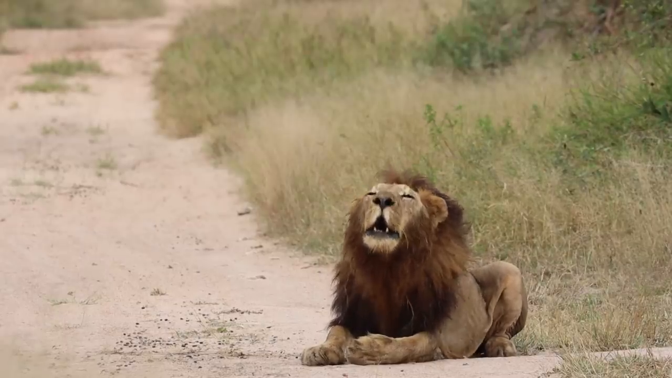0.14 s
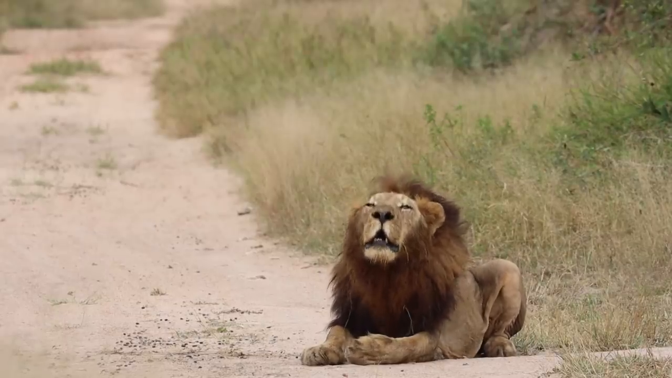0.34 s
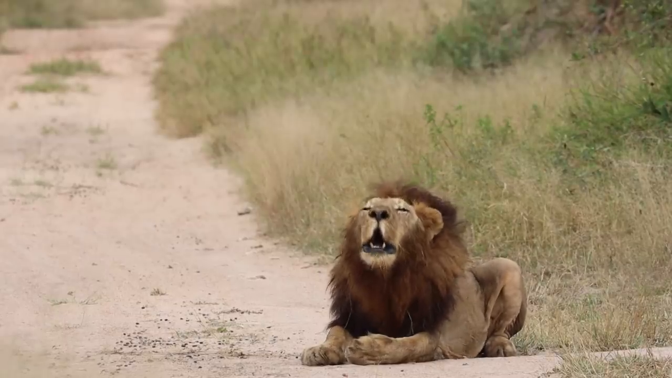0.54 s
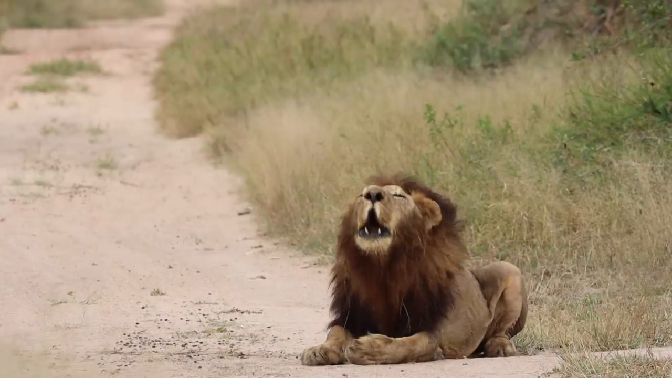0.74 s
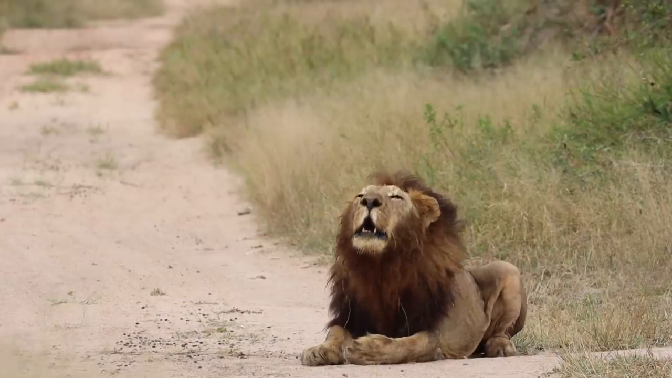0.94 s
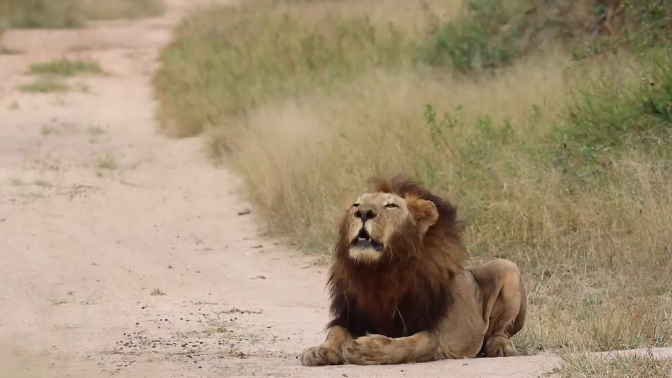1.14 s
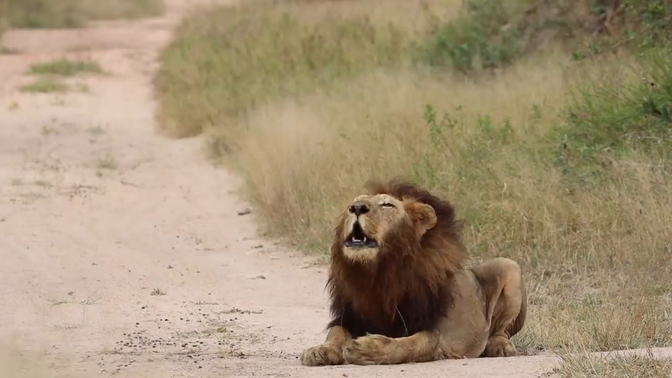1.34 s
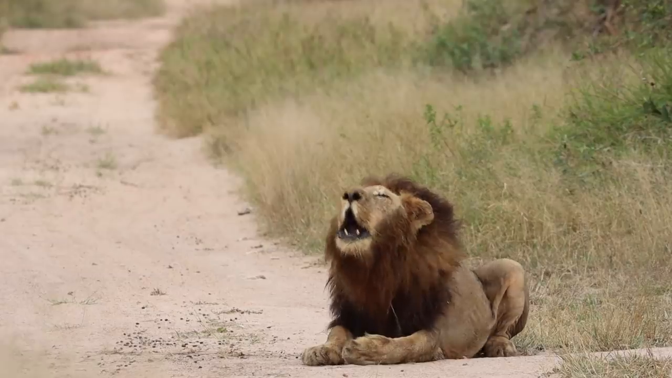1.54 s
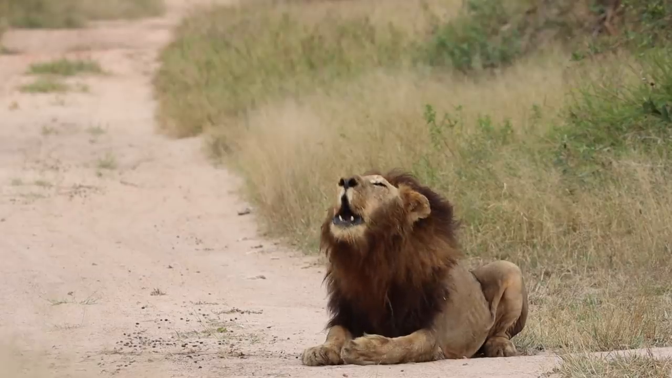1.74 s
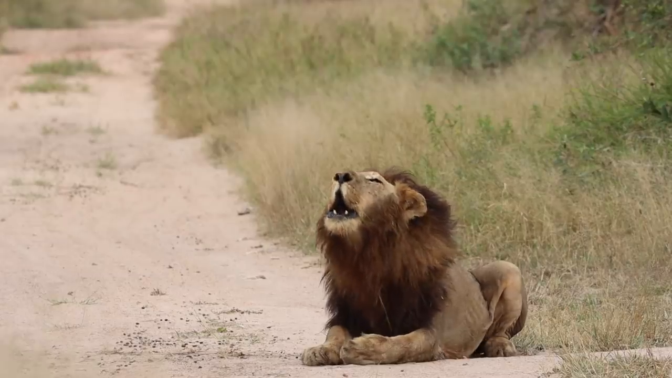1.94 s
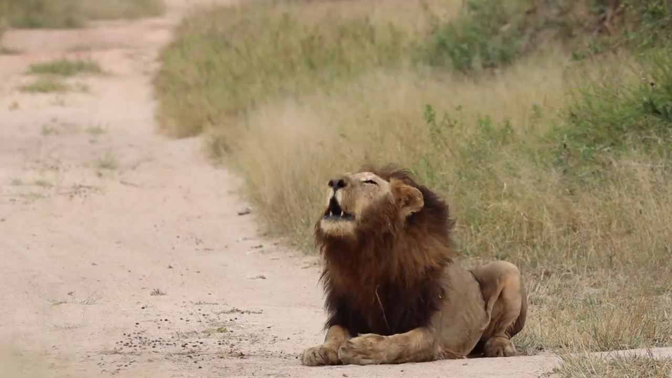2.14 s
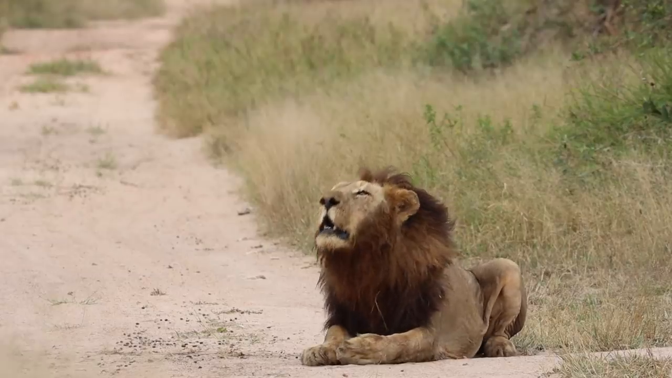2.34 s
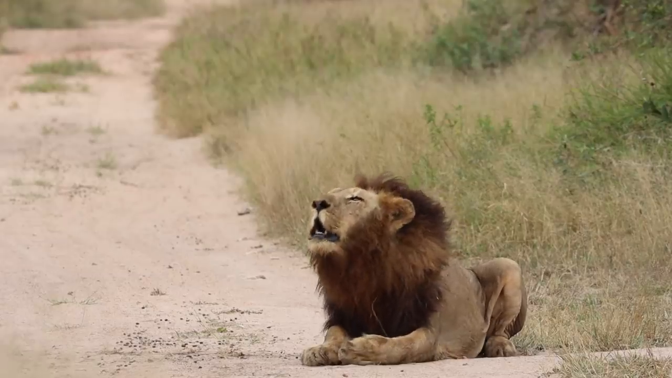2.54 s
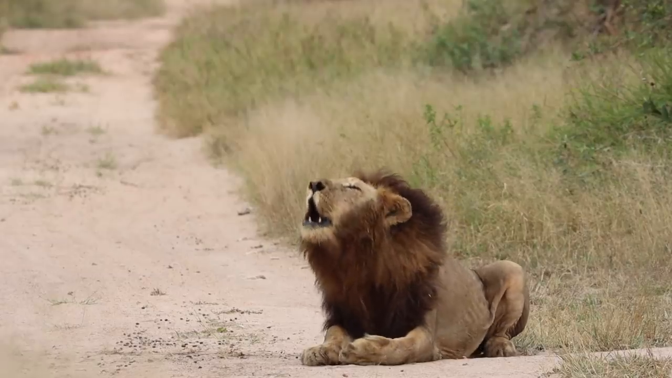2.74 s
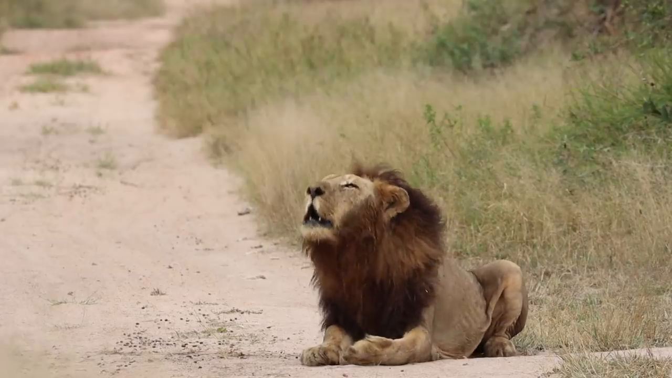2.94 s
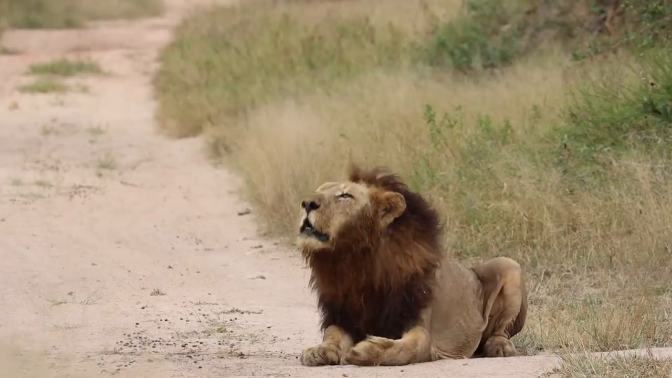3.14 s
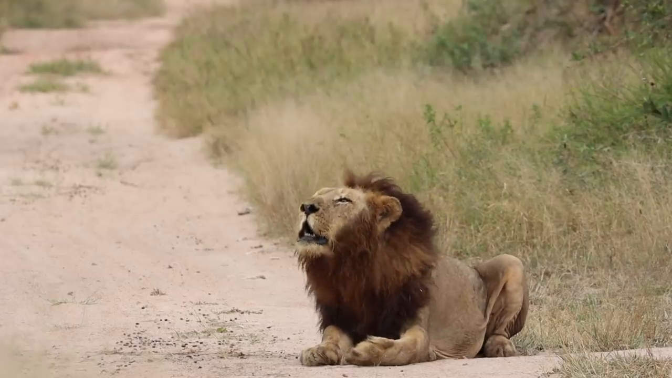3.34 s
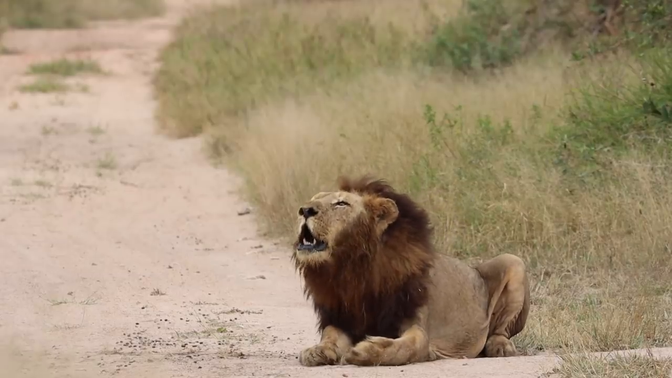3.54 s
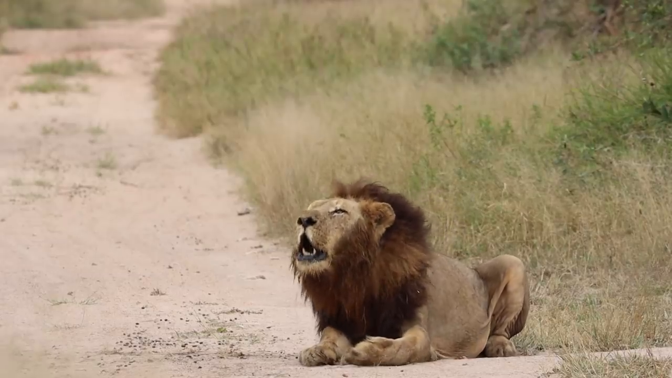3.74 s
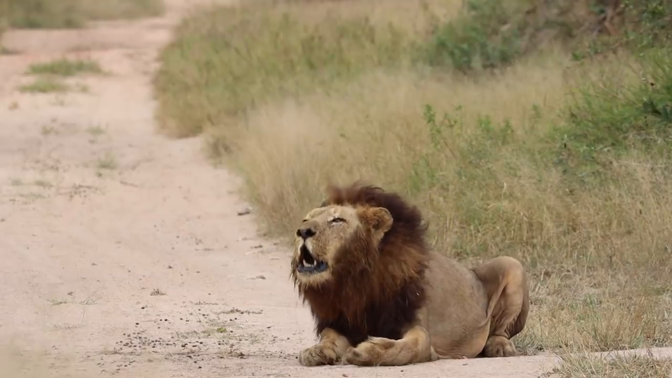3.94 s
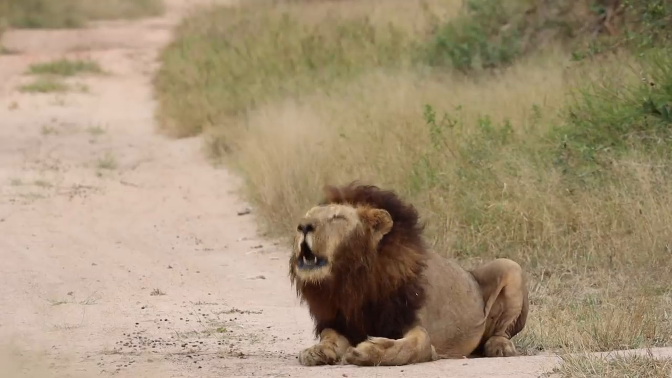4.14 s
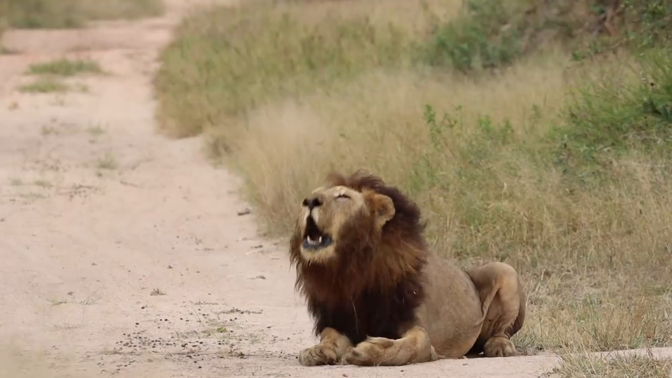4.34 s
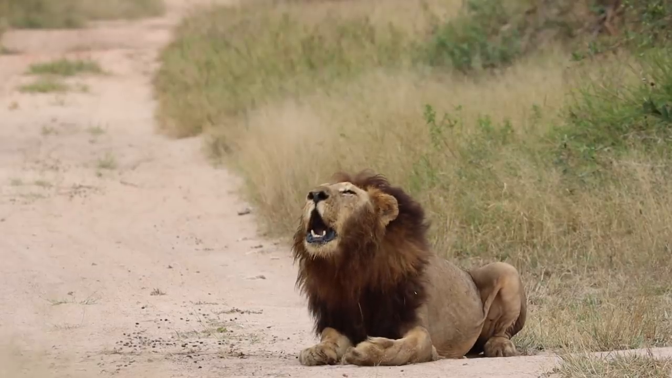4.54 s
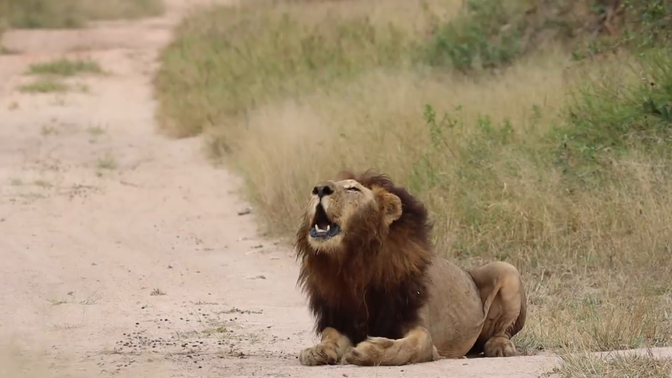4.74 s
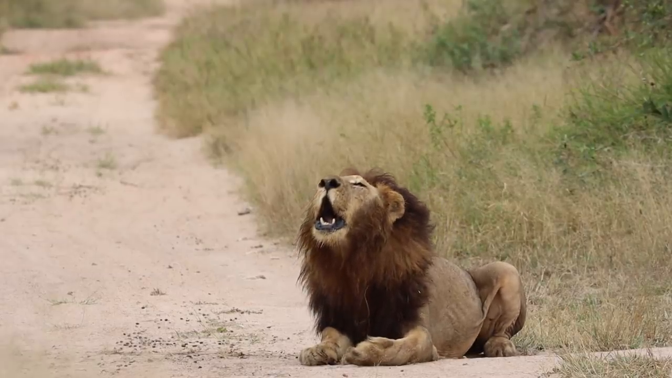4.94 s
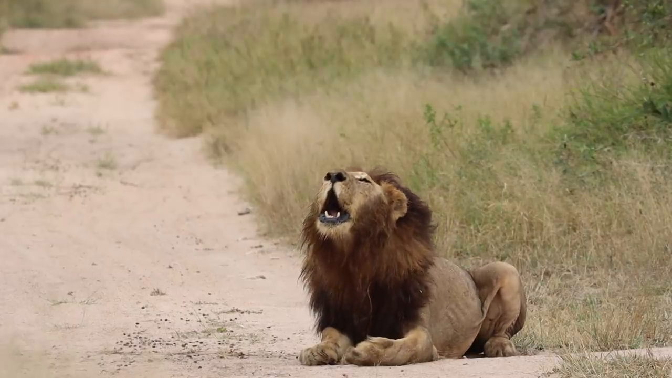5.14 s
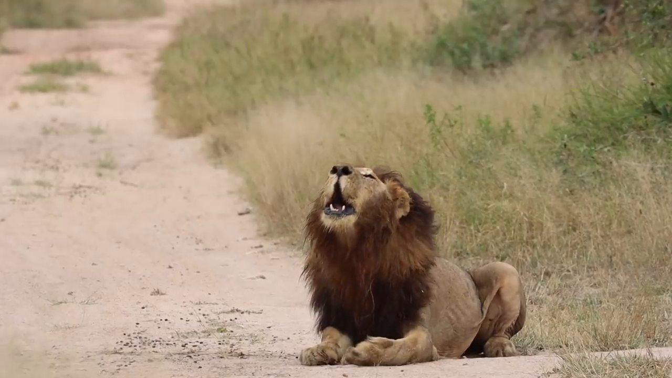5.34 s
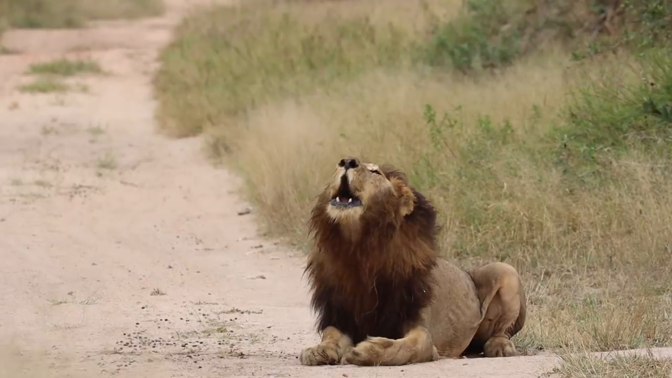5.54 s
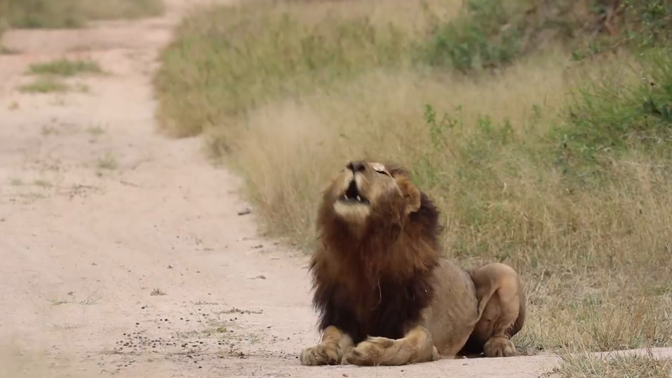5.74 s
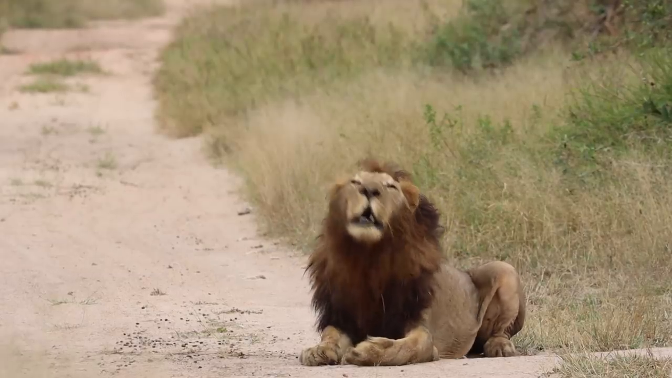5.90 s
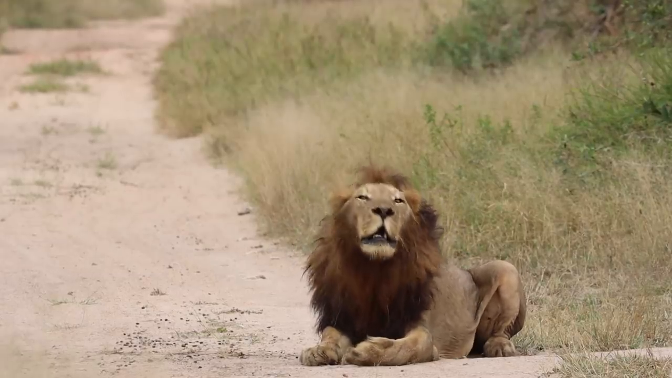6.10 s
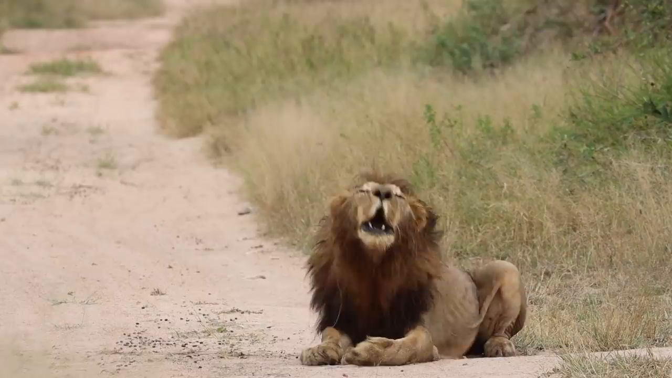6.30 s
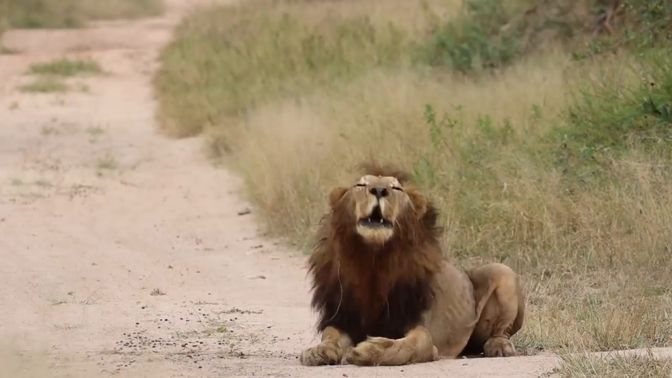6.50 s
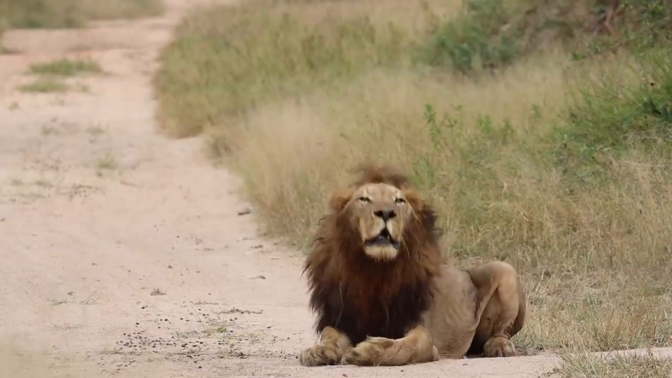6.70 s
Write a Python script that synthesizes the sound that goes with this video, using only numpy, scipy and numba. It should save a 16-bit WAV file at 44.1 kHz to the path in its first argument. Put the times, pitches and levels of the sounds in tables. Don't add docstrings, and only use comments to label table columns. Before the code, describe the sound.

Deep, hoarse lion grunts, wet and rasping, each lasting a fraction of a second; the third is longer and doubled. The animal sucks in air with a low growl between calls. After a quiet pause comes one powerful roar, open and nearly tonal, then harsh, breaking and dropping. A final short grunt follows. Natural outdoor pickup, mostly dry, with soft wind, insects, sparse high chirps and little plastic clicks.

```python
import sys
import numpy as np
from scipy import signal
from scipy.fft import rfft, irfft, next_fast_len
from scipy.io import wavfile
from scipy.ndimage import uniform_filter1d, map_coordinates
from numba import njit

SR = 44100
rng = np.random.default_rng(int(sys.argv[2]) if len(sys.argv) > 2 else 0)


def unload_wav(signal):
    wavfile.write(
        sys.argv[1],
        SR,
        np.round(np.clip(np.atleast_2d(signal).T, -1, 1) * 32767).astype(np.int16),
    )


def invert_db(level):
    return 10 ** (np.asarray(level, dtype=float) / 20)


N = 298116
TIME = np.arange(N) / SR
ONSET_S, SILENT_DB = .035, -74.5

# frequency in Hz, level in dB per Hz.
BREATH_WIDE = [(1000, -43), (1700, -13.5), (2910, -3.5), (3800, -9.5), (5200, -8.5), (6090, -17.5),
               (7600, -18.5), (10400, -25.5), (12400, -21.5), (15500, -40)]
# frequency in Hz, gain in dB.
NOSE_VALLEY = [(1500, 0), (1620, -7), (1720, -17), (1830, -3), (2000, 0)]


def unit(x):
    return x / np.sqrt(np.mean(x ** 2) + 1e-20)


def steady(x, span_s):
    span = int(span_s * SR)
    power = uniform_filter1d(uniform_filter1d(x ** 2, span), span)
    return x / np.sqrt(np.abs(power) + 1e-20)


def along(points, hz):
    f, v = np.transpose(points)
    return np.interp(np.log(hz + 1), np.log(f + 1), v)


def curves(rows):
    s, *cols = np.transpose(rows)
    return [np.interp(TIME, s, c) for c in cols]


def wobble(rate_hz):
    return map_coordinates(rng.standard_normal(int(N * rate_hz / SR) + 4), [TIME * rate_hz])


def filtered(x, response):
    m = next_fast_len(N + SR // 2)
    return irfft(rfft(x, m) * response(np.fft.rfftfreq(m, 1 / SR)), m)[..., :N]


def shaped(x, points):
    return filtered(x, lambda f: invert_db(along(points, f)))


def resonant_noise(hz, width_hz):
    response = lambda f: 1j * f * width_hz / (hz * hz - f * f + 1j * f * width_hz)
    return unit(filtered(rng.standard_normal(N), lambda f: response(f) ** 2))


def patchy(x, bins, frames, depth_db):
    z = signal.stft(x, nperseg=512)[2]
    field = uniform_filter1d(rng.standard_normal(z.shape[-2:]), bins, 0)
    field = uniform_filter1d(field, frames, 1)
    return signal.istft(z * invert_db(depth_db * unit(field)), nperseg=512)[1][..., :N]


def glides(rows):
    out = np.zeros(N + SR)
    for s, length_s, from_hz, to_hz, db in rows:
        u = np.linspace(0, 1, int(length_s * SR))
        hz = from_hz + (to_hz - from_hz) * u ** 1.3
        sweep = np.sin(2 * np.pi * np.cumsum(hz) / SR)
        out[int(s * SR):][:len(u)] += invert_db(db) * np.sin(np.pi * u) * sweep
    return out[:N]


@njit
def two_pole(x, turn, keep):
    y = np.zeros(len(x))
    for i in range(2, len(x)):
        y[i] = (1 - keep) * (x[i] - x[i - 2]) + 2 * keep * np.cos(turn[i]) * y[i - 1] - keep * keep * y[i - 2]
    return y


def wandering(x, modes, reach, lift):
    out = np.zeros(N)
    for k, (hz, width_hz, db) in enumerate(modes):
        turn = 2 * np.pi * hz / SR * lift * (1 + reach * wobble(12))
        keep = np.exp(-np.pi * width_hz / SR)
        out += (-1) ** k * invert_db(db) * two_pole(two_pole(x, turn, keep), turn, keep)
    return out


def bush():
    # frequency in Hz, level in dB per Hz.
    spectrum = [(18, -81.5), (30, -42.5), (140, -2.5), (307, -21.5), (341, -5.5), (532, -6.5), (709, -13.5),
                (852, -8.5), (970, -19.5), (1170, -13), (1820, -23), (2360, -22.5), (3320, -25.5),
                (6720, -30), (15500, -36.5)]
    # frequency in Hz, left-right likeness from -1 to 1.
    likeness = [(60, 0.49), (240, 0.89), (950, 0.13), (3770, -0.24), (15000, -0.019)]
    pair = patchy(rng.standard_normal((2, N)), 6, 10, 1.6)

    def mid_side(hz):
        angle = np.arccos(np.clip(along(likeness, hz), -1, 1)) / 2
        return invert_db(along(spectrum, hz)) * [np.cos(angle), np.sin(angle)]
    mid, side = filtered(pair, mid_side)
    return invert_db(-52 + wobble(3)) * unit(np.array([mid + side, mid - side]))


def insects():
    # centre in Hz, width in Hz, level in dB.
    drones = [(2350, 170, -69), (6520, 50, -83)]
    total = sum(invert_db(db + 1.5 * wobble(48)) * resonant_noise(hz, width_hz) for hz, width_hz, db in drones)
    return total * invert_db([[-1], [1]])


def bird():
    # start in seconds, length in seconds, from Hz, to Hz, level in dB.
    chirps = [
        (.3, 0.076, 7600, 8000, -81),
        (.49, 0.041, 7950, 8820, -67),
        (2.4, 0.049, 9680, 8710, -71),
        (3.49, 0.061, 7880, 8340, -67),
        (3.54, 0.014, 8170, 9200, -72),
    ]
    return glides(chirps)


def camera():
    # time in seconds, peak in dB.
    ticks = [
        (1.188, -53.5),
        (3.391, -52),
        (3.597, -52.5),
        (3.887, -74),
        (4.1, -51.5),
        (5.947, -54.5),
    ]
    # frequency in Hz, level in dB, t60 in seconds.
    shell = [(1144, 12.5, .018), (2354, 11, .022), (4500, 3, .01)]
    out, t = np.zeros(N + SR), np.arange(SR // 10) / SR
    for s, db in ticks:
        knock = 0.43 * invert_db(-60 * t / .01) * rng.standard_normal(len(t))
        for hz, level_db, t60_s in shell:
            knock += invert_db(level_db + rng.normal(0, 3.2) - 60 * t / t60_s) * np.sin(2 * np.pi * hz * t)
        out[round(s * SR):][:len(t)] += invert_db(db - 3.5) * knock
    return out[:N] * invert_db([[-2], [2]])


def scatter(x):
    # frequency in Hz, gain in dB.
    gain = [(60, -30), (500, -24), (900, -22), (1300, -13), (1680, -7), (2100, -15), (3400, -26),
            (6900, -12), (10000, -13), (11500, -11), (15000, -17)]
    t = np.arange(SR // 40) / SR
    tail = rng.standard_normal(len(t)) * invert_db(-60 * t / .02)
    spread = signal.fftconvolve(x, tail / np.linalg.norm(tail))[:N]
    return shaped(spread, gain) * [[1], [-1]]


def echoes(x):
    # frequency in Hz, t60 in seconds.
    decay = [(140, 0.99), (400, 0.27), (1500, 0.38), (3000, 0.19), (8000, 0.39)]
    hz, t, z = signal.stft(rng.standard_normal((2, SR)), SR, nperseg=256)
    tail = signal.istft(z * invert_db(-60 * t / along(decay, hz)[:, None]), SR, nperseg=256)[1]
    tail = 3.2 * tail[0] + 0.1 * tail
    delayed = np.pad(x, (1500, 0))[None]
    return signal.fftconvolve(delayed, tail / np.linalg.norm(tail[0]), axes=1)[:, :N]


def slaps():
    # time in seconds, peak in dB, centre in Hz.
    tissue = [(0.0179, -21, 2860), (0.1206, -23.5, 3100), (0.7457, -29, 2914), (0.855, -13.5, 3160),
              (0.9277, -21, 3020), (0.9452, -22.5, 2590), (1.6185, -31, 5211), (1.6644, -38, 1802),
              (1.8038, -31, 3987), (1.953, -35, 3020), (2.023, -33, 1813), (2.0384, -31, 3050),
              (2.0683, -22, 3640), (2.0913, -35, 3080), (2.1327, -25, 2880), (2.1518, -21.5, 2750),
              (2.2039, -31.5, 2943), (2.7652, -28, 3193), (2.8143, -17, 2895), (2.8882, -19, 2740),
              (2.9181, -21.5, 3447), (4.2298, -34.5, 2309), (4.2805, -22, 2950), (4.3642, -35, 2812),
              (4.9929, -23, 3376), (5.0604, -22, 3082), (5.4237, -27, 2083), (5.6051, -30, 3048),
              (5.7154, -18, 2951), (5.7362, -21, 2600), (5.7823, -18.5, 3036), (5.8638, -38, 2633),
              (6.4059, -44, 3128), (6.4536, -18.5, 2819), (6.545, -34.5, 5050), (6.561, -20, 3297)]
    # time in seconds, peak in dB, centre in Hz.
    smacks = [(0.017, -12, 816), (0.12, -8, 810), (0.73, -15.5, 739.6), (0.838, -24, 1130),
              (0.904, -14, 732), (0.945, -20.5, 732), (1.465, -27, 1150), (1.527, -31, 900),
              (1.548, -34, 800), (1.626, -19.5, 775), (2.793, -17, 805), (2.916, -27, 866),
              (4.194, -32.5, 733.5), (5.605, -17, 706), (6.405, -20, 749.4)]
    out, t = np.zeros(N + SR), np.arange(SR // 20) / SR
    f = np.fft.rfftfreq(len(t), 1 / SR) + 1
    for rows, octaves, t60_s, over_db in ((tissue, .6, .04, -9), (smacks, .3, .045, -8)):
        for s, db, hz in rows:
            colour = np.exp(-.5 * (np.log2(f / hz) / octaves) ** 2) + invert_db(-20 + along(BREATH_WIDE, f))
            puff = unit(irfft(rfft(rng.standard_normal(len(t))) * colour, len(t)))
            decay = invert_db(db + over_db - 60 * t / t60_s)
            out[round(s * SR):][:len(t)] += decay * puff * np.minimum(t / 0.0027, 1)
    return out[:N]


def gurgles():
    # start in seconds, length in seconds, from Hz, to Hz, level in dB.
    throat_sweeps = [(.08, 0.057, 233, 407, -19.5), (.69, 0.16, 191.3, 169, -17), (.765, 0.056, 648, 733, -24),
                     (.85, 0.047, 493, 428, -22), (.915, 0.079, 327.9, 447, -24),
                     (1.59, 0.1, 108.6, 96.27, -26.5), (1.945, 0.083, 462, 384.5, -25),
                     (2.03, 0.058, 256.3, 346.4, -19.5), (2.095, 0.096, 269, 397.6, -23.5),
                     (2.735, 0.06, 217.8, 180.7, -25.5), (2.905, 0.078, 321.4, 462.5, -26.5),
                     (4.18, 0.097, 111.5, 89.7, -31.5), (5.05, 0.051, 54.6, 45.1, -44),
                     (5.625, .05, 782, 685.2, -24.5), (5.645, 0.049, 241.2, 339, -19),
                     (5.695, .05, 1132, 946.2, -35.5), (5.722, 0.047, 582.5, 901, -19.5),
                     (5.78, 0.033, 393, 503.8, -21), (5.805, 0.037, 526.3, 922.4, -35.5),
                     (6.395, 0.015, 131, 161.2, -27), (6.515, .1, 260.7, 484.6, -18)]
    return glides(throat_sweeps)


def fold_state():
    # start in seconds, glide in seconds, clear share, regular flutter share, mouth closing (all 0-1).
    changes = [(0, 0, .2, .45, 0), (1.64, .05, .05, .8, 0), (1.86, .04, .23, .43, 0),
               (4.24, .07, .55, .3, .6), (4.3, .09, .93, .2, .6), (4.41, .06, 1, .2, 0),
               (4.7, .04, 1, .15, 1), (4.975, .02, .45, .3, 1), (5.13, .04, .72, .2, 1),
               (5.27, .03, .1, .8, .4), (5.55, .04, .25, .4, 0)]
    rows = []
    for (s, glide_s, *new), old in zip(changes, changes[:1] + changes[:-1]):
        rows += [(s, *old[2:]), (s + glide_s, *new)]
    return curves(rows)


def drawn_air():
    # start in seconds, peak in seconds, end in seconds, peak in dB.
    draws = [
        (0.483, 0.628, 0.74, -40),
        (1.294, 1.515, 1.58, -33),
        (2.482, 2.662, 2.72, -45),
        (6.103, 6.318, 6.56, -44),
    ]
    swell_db = 18
    rows = []
    for start, peak, end, db in draws:
        rows += [(start - ONSET_S, SILENT_DB), (start, db - swell_db), (peak, db),
                 (end, db - swell_db), (end + ONSET_S, SILENT_DB)]
    return curves(rows)[0] + 3 * wobble(18)


def voice_curves(clear, closing):
    # time in seconds, pitch in Hz, effort in dB, rasp in dB over the effort.
    grunt_1 = [(0.0, 159, -10, -23), (0.028, 150.7, -5.5, -13), (0.064, 144.4, -13, -10),
               (0.086, 136.9, -10.5, -22), (0.098, 124.2, -15, -17), (0.12, 119.5, -10, -21),
               (0.162, 111.2, -19.5, -11.5), (0.2, 112.4, -30.5, -20)]
    grunt_2 = [(0.706, 156.9, -23.5, -39), (0.747, 141.1, -14.5, -2.5), (0.77, 146.7, -7, -21.5),
               (0.793, 134.8, -18, -10.5), (0.817, 135, -16, -18), (0.841, 137.5, -8.5, -10),
               (0.879, 140.4, -18.5, -11), (0.916, 120.2, -17.5, -26.5), (0.987, 121.1, -26, -22)]
    grunt_3 = [(1.602, 158.5, -30.5, -19), (1.626, 152.6, -22, -1.5), (1.663, 151.8, -6, -12),
               (1.703, 153.8, -7.5, -22), (1.795, 152.4, -10, -18), (1.85, 153, -11.5, -15.5),
               (1.902, 140, -23.5, -12),
               (1.925, 135.1, -17, -23.5), (1.956, 138.4, -16.5, -9.5), (1.985, 140.2, -13.5, -18),
                   (2.02, 129.6, -19, -25), (2.077, 129.7, -13, -17), (2.116, 122.3, -15, -14.5),
                   (2.13, 124.6, -12, -18), (2.182, 115.6, -15, -27.5), (2.22, 111.1, -39.5, -14.5)]
    grunt_4 = [(2.75, 136.9, -26.5, -24), (2.796, 140.2, -12, -15), (2.836, 140.8, -4.5, -23),
               (2.86, 139.8, -12.5, -8.5), (2.89, 123.6, -12, -21), (2.925, 124.1, -12.5, -15),
               (2.965, 119.1, -24.5, -18), (2.991, 119, -29.5, -28)]
    grunt_5 = [(6.4, 125.5, -36.5, -8), (6.44, 139.8, -7, -18.5), (6.482, 140, -7.5, -16.5),
               (6.518, 121.1, -12, -23.5), (6.564, 115.1, -12.5, -21), (6.582, 114, -18.5, -16),
               (6.608, 110, -30, -17.5), (6.64, 112.6, -36.5, -22)]
    # as for the grunts, then throat share in dB.
    rising = [(4.19, 143.2, -40.5, -16, -6.5), (4.232, 147.2, -18.5, -16, -6.5),
              (4.258, 156.1, -20.5, -13.5, -2.5), (4.294, 156.1, -7, -15.5, -17),
              (4.33, 157.8, -5.5, -24, -20), (4.394, 204, -10.5, -19.5, -12.5),
              (4.442, 216.8, -10.5, -22.5, -8), (4.53, 221, -9.5, -27.5, -3)]
    steady_clear = [(4.55, 214, -11.5, -16, -1), (4.585, 210, -12.5, -14.5, -.2),
                    (4.69, 214.5, -11, -16, -2), (4.74, 200, -10.5, -25, -12),
                    (4.87, 194, -8.5, -21.5, -18), (4.97, 193.5, -11.5, -22, -10)]
    harsh = [(4.99, 197, -12, -16, -7.5), (5.098, 192.6, -12.5, -17.5, -3), (5.147, 205.4, -13, -12, -2.5),
             (5.254, 200, -9.5, -18, -1.5), (5.291, 171.9, -11, -13, -10.5), (5.319, 168.2, -7, -21, -14),
             (5.39, 164.2, -8.5, -21, -12), (5.559, 163.6, -8, -21.5, -14)]
    sinking_growl = [(5.578, 137.7, -24, -15, -1.5), (5.617, 142.6, -13.5, -14, -9.5),
                     (5.65, 139.5, -11, -20, -14.5), (5.678, 141.2, -21, -23.5, 0),
                     (5.699, 143.2, -15, -14, -13),
                     (5.729, 141, -12.5, -19, -3.5), (5.746, 138.6, -22.5, -16.5, -2),
               (5.763, 127.3, -18.5, -16, -14), (5.795, 119.2, -20, -16.5, -0.5),
               (5.831, 120.5, -18, -23, -27), (5.843, 126.6, -30.5, -14, -26.5),
               (5.88, 141, -34, -31, -4.5)]
    draw_over_db = [-1, -4, -11.5, -17.5, -9]

    def shared(grunt):
        return [(s, hz, db, rasp, -8 + .39 * (rasp + 15) - .16 * (hz - 135)) for s, hz, db, rasp in grunt]
    calls = [shared(g) for g in (grunt_1, grunt_2, grunt_3, grunt_4)]
    calls += [rising + steady_clear + harsh + sinking_growl, shared(grunt_5)]
    onset_hz, release_s = 200, .09
    rows = []
    for call in calls:
        first, _, _, *start = call[0]
        last, end_hz, _, *end = call[-1]
        rows += [(first - ONSET_S, onset_hz, SILENT_DB, *start), *call,
                 (last + release_s, end_hz, SILENT_DB, *end)]
    pitch_hz, effort, rasp, share = curves(rows)
    chest = effort - 13 * invert_db(4 * share)
    hiss = effort - 29 + .65 * (rasp + 15) + 2 * closing - 5.5 * clear
    rumble = -39.5 + .42 * effort - .32 * (pitch_hz - 120) + np.minimum(effort + 40, 0)
    levels = [chest, effort + share, effort + rasp, hiss, rumble]
    draw = drawn_air()
    levels = [20 * np.log10(invert_db(db) + invert_db(draw + over_db)) for db, over_db in zip(levels, draw_over_db)]
    return np.where(draw > effort, 161.3, pitch_hz), *levels


def vocal_tract():
    # time in seconds, throat in Hz, back of mouth in Hz, brightness in dB.
    larynx = [
        [(0.0, 377, 670, 4), (0.048, 407, 710, 2), (0.088, 327, 676, -2), (0.168, 380, 702, 4.5),
         (0.2, 343, 690, -12)],
        [(0.72, 372, 657, 3), (0.756, 420, 680, 10), (0.814, 383.3, 669.3, 1.5), (0.87, 422, 682.3, 6),
         (0.924, 360, 670, 10), (0.99, 391, 716, 2)],
        [(1.62, 368, 686, 2), (1.804, 390, 761, -2.5), (1.918, 336.1, 656, 5), (1.942, 383, 706.7, 1.5),
         (2.124, 327.3, 720, 2.5), (2.2, 337, 720, 3)],
        [(2.77, 342.1, 708.6, -2), (2.82, 371, 714, 1), (2.934, 349, 732.2, 2), (2.98, 384, 696, 4)],
        [(4.22, 348.5, 719, 8.5), (4.264, 363, 705.5, 2.5), (4.32, 411.6, 752, 1), (4.4, 350.6, 700, -3)],
        [(4.98, 389.7, 687, -4), (5.124, 407.5, 691.8, 2), (5.542, 387.5, 683, -3), (5.682, 330.4, 731, 3),
         (5.798, 424.5, 727.7, 9), (5.85, 425, 664, -9)],
        [(6.42, 361.5, 697.7, 2), (6.468, 398.8, 721.3, 2), (6.52, 343.4, 673, 5), (6.568, 355.2, 733, 4.5),
         (6.62, 398.6, 729.6, -3)],
    ]
    return curves([row for call in larynx for row in call])


def clear_voice(cycles, closing, pitch_hz):
    # pitch multiple, level in dB.
    low_open = [(3, -16), (4, -21), (5, -32), (6, -19), (7, -40)]
    # pitch multiple, level in dB.
    low_round = [(3, -22), (4, -26), (5, -31), (6, -37), (7, -35)]
    # frequency in Hz, level in dB.
    high_open = [(1700, -4), (1910, -13), (2120, -3), (2550, -7), (2970, 1), (3180, -14), (3600, -3),
                 (4000, -11), (4700, -19), (5400, -23), (6400, -12), (8500, -26)]
    # frequency in Hz, level in dB.
    high_round = [(1550, 0), (1750, -8), (2050, -6), (2450, -13), (3100, -2), (3500, 5), (3880, -7),
                  (4070, 0), (4850, -22), (5630, -11), (5900, -22), (8000, -30)]
    k = np.arange(3, 41)[:, None]
    part = slice(int(4.22 * SR), int(5.58 * SR))
    close, hz = closing[part], k[5:] * pitch_hz[part]
    low_db = np.transpose(low_open)[1][:, None] * (1 - close) + np.transpose(low_round)[1][:, None] * close
    knots = rng.standard_normal((len(hz), 20))
    shimmer = np.array([np.interp(np.linspace(0, 19, len(close)), np.arange(20), row) for row in knots])
    high_db = along(high_open, hz) * (1 - close) + along(high_round, hz) * close + 3.5 * shimmer
    gain = invert_db(np.vstack([low_db, high_db]))
    wave = gain * np.sin(2 * np.pi * k * cycles[part] - rng.uniform(0, 2 * np.pi, k.shape))
    groups = np.zeros((3, N))
    groups[0] = np.sqrt(2) * np.sin(4 * np.pi * cycles)
    for out, rows in zip(groups[1:], (slice(5), slice(5, None))):
        out[part] = wave[rows].sum(0) / np.sqrt((gain[rows] ** 2).sum(0) / 2)
    return groups * invert_db([[0], [0], [-.5]])


def rough_pulses(cycles, flutter):
    at = np.flatnonzero(np.diff(np.floor(cycles)))
    luck = rng.standard_normal((len(at), 2))
    beat = np.cos(2 * np.pi * np.cumsum(57.5 + 1.63 * wobble(8)) / SR)[at]
    share = flutter[at]
    size = 0.24 + np.sqrt(2 * share) * beat + np.sqrt(1 - share) * luck[:, 0]
    shift = .0009 * SR * (1 - share) * luck[:, 1]
    return np.bincount(np.clip(at + shift, 0, N - 1).astype(int), size, N)


def throat_sound(pulses, gust, flutter, closing, throat_hz):
    # centre in Hz, width in Hz, level in dB.
    modes = [(233, 220, -1), (355, 40, 2), (416.5, 73.5, 4)]
    drive = unit(pulses) + .5 * (1 - flutter) * unit(gust)
    height = throat_hz / 390
    lowest = invert_db(-12 * closing) * wandering(drive, modes[:1], .04, height)
    return steady(lowest - wandering(drive, modes[1:], .04, height), 0.021)


def mouth_sound(pulses, gust, flutter, closing, back_hz):
    # centre in Hz, width in Hz, level in dB.
    modes = [(676, 114, 25.5), (797, 100, 24), (1045, 160, 17), (1200, 130, 12), (1430, 250, 12)]
    # time in seconds, centre in Hz, strength in dB.
    tongue = [
        [(0.0, 1060, -3), (0.166, 1055, -6), (0.2, 1010, 23)],
        [(0.72, 1076, -7), (0.786, 1060, -3), (0.844, 1119, -8), (0.99, 1090, 13)],
        [(1.62, 1014, -14.5), (1.686, 1103, -4.5), (2.046, 1026, -5.5), (2.164, 1094, -4.5), (2.2, 1010, -1)],
        [(2.77, 1080, -8), (2.946, 1003, -6), (2.98, 1080, 0)],
        [(4.22, 1230, -2), (4.274, 1085, -6.5), (4.376, 1130, -2.5), (4.4, 1065, 9)],
        [(4.98, 991, -9), (5.068, 1046, -6.5), (5.144, 978.7, -12), (5.324, 1105, -7.5), (5.776, 1034, -2),
         (5.85, 971, -12)],
        [(6.42, 1082, -5), (6.576, 1054, -8), (6.62, 1016, -9)],
    ]
    t = np.arange(SR // 60) / SR
    touches = rng.standard_normal(len(t)) * invert_db(-60 * t / .02)
    smeared = signal.fftconvolve(pulses, touches)[:N]
    rasp = unit(smeared) + (.8 - .55 * flutter) * unit(gust)
    back = wandering(rasp, modes[:2], .045, back_hz / 720)
    front_hz, front_db = curves([row for call in tongue for row in call])
    front = wandering(rasp, modes[2:4], .03, front_hz / 1090)
    front += invert_db(7 * closing) * wandering(rasp, modes[4:], .03, 1)
    return steady(shaped(back + invert_db(front_db + 4) * front, NOSE_VALLEY), 0.013)


def snarl(gust, pitch_hz):
    # centre in Hz, width in Hz, level in dB.
    teeth = [(2420, 70, -3), (2640, 60, 2), (2870, 90, 5), (3090, 90, 5)]
    # start in seconds, end in seconds, level over the hiss in dB.
    tight = [
        (2.817, 2.973, 4),
        (4.998, 5.265, 3.5),
        (6.427, 6.572, 4.5),
    ]
    rest_db, glide_s = -12, .02
    rows = []
    for start, end, db in tight:
        rows += [(start - glide_s, rest_db), (start, db), (end, db), (end + glide_s, rest_db)]
    lift = (np.clip(pitch_hz, 115, 165) / 145) ** .4
    return invert_db(curves(rows)[0]) * steady(wandering(gust, teeth, .006, lift), .05)


def breath_hiss(gust, clear, closing, pitch_hz, bright_db):
    # frequency in Hz, level in dB per Hz.
    air_round = [(1000, -52), (1700, -4), (2220, -14.5), (3160, -11), (3630, -10), (5400, -11), (6440, -25),
                 (12300, -16), (13700, -30), (15500, -102)]
    # frequency in Hz, level in dB per Hz.
    air_clear = [(1000, -51), (2000, -13.5), (3500, -9.5), (5200, -16), (7400, -11.5), (9300, -23),
                 (12300, -8.5), (14500, -17.5)]
    wide, rounded, calm = (unit(shaped(gust, air)) for air in (BREATH_WIDE, air_round, air_clear))
    even = clear ** 12
    breath = (1 - even) * ((1 - closing) * wide + closing * rounded) + even * calm
    hiss = steady(breath, 0.034) + snarl(gust, pitch_hz)
    top = filtered(hiss, lambda f: 1 / (1 + (4750 / (f + 1)) ** 6))
    hiss = shaped(hiss + (invert_db(bright_db) - 1) * top, NOSE_VALLEY)
    return patchy(hiss, 8, 4, 2.5) * invert_db(1.5 * wobble(40))


def lion():
    clear, flutter, closing = fold_state()
    pitch_hz, chest_db, throat_db, mouth_db, hiss_db, rumble_db = voice_curves(clear, closing)
    throat_hz, back_hz, bright_db = vocal_tract()
    slack = np.clip((-28 - chest_db) / 10, 0, 1)
    chaos = (1 - clear) * (1 - flutter) + 1.5 * slack
    cycles = np.cumsum(pitch_hz * (1 + .0015 * wobble(25) + .05 * chaos * wobble(45))) / SR
    chest = np.sqrt(2) * np.sin(2 * np.pi * cycles) * invert_db(3.5 * chaos * wobble(60))
    pulses = rough_pulses(cycles, flutter)
    puff = filtered(np.abs(pulses), lambda f: 1 / (1 + 1j * f / 60) ** 2)
    gust = rng.standard_normal((3, N)) * (1.3 + unit(puff))
    rough = [throat_sound(pulses, gust[0], flutter, closing, throat_hz),
             mouth_sound(pulses, gust[1], flutter, closing, back_hz),
             breath_hiss(gust[2], clear, closing, pitch_hz, bright_db)]
    can_clear = [1 + .6 * closing * (1 - clear), .997 * clear ** 6, .8 * clear ** 8]
    voice = invert_db(chest_db) * chest
    harmonics = clear_voice(cycles, closing, pitch_hz)
    for db, b, tone, noise in zip((throat_db, mouth_db, hiss_db), can_clear, harmonics, rough):
        voice += invert_db(db) * (np.sqrt(clear * b) * tone + np.sqrt(1 - clear * b) * noise)
    voice = filtered(voice, lambda f: (1j * f / (260 / 3 + 1j * f)) ** 3)
    rumble = invert_db(rumble_db) * resonant_noise(70, 60)
    return voice + rumble + shaped(slaps(), NOSE_VALLEY) + gurgles()


def at_ports(x):
    # frequency in Hz, left minus right in dB.
    lean = [(60, -.3), (170, -.6), (480, -.1), (720, .6), (860, -.2), (1030, -3.2), (1250, -2.7),
            (1450, -4.5), (1900, .3), (3900, -.4), (5200, -2.1), (6900, -2.5), (9300, -.5), (12000, -2.7)]
    # frequency in Hz, left lead in radians.
    lead = [(60, 0), (520, -.04), (690, -.16), (880, -.42), (1200, -.2), (1300, -.32), (1500, -.02),
            (1720, .35), (2070, 0), (15200, -.05)]
    halves = [.5, -.5]
    return filtered(x, lambda f: invert_db(np.outer(halves, along(lean, f)))
                    * np.exp(1j * np.outer(halves, along(lead, f))))


def scene():
    roar = lion()
    background = bush() + insects() + bird() + camera()
    return at_ports(roar) + scatter(roar) + invert_db(-23) * echoes(roar) + background


def roll_off(x):
    return signal.sosfilt(signal.butter(12, 15700, fs=SR, output="sos"), x)


def record(dry):
    ceiling, knee, top_hz = .9, 6, 15700
    dry = dry / (1 + np.abs(dry / ceiling) ** knee) ** (1 / knee)
    return roll_off(filtered(dry, lambda f: f < top_hz))


dry = scene()
out = record(dry)
unload_wav(out)
```